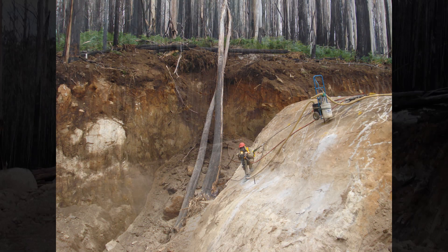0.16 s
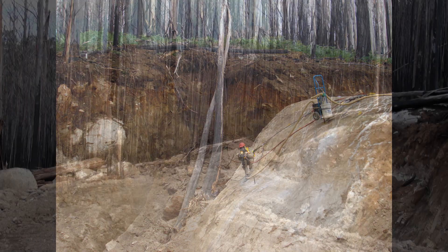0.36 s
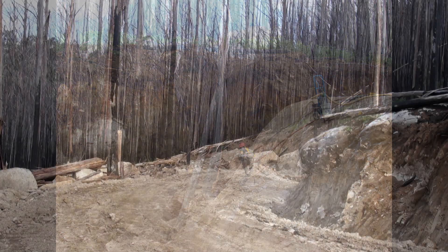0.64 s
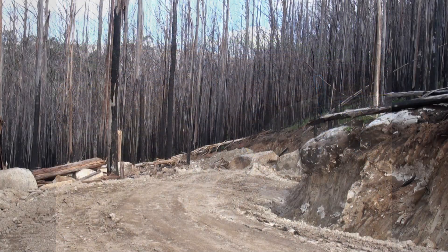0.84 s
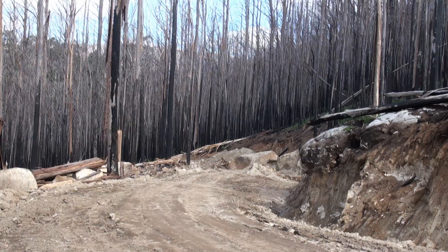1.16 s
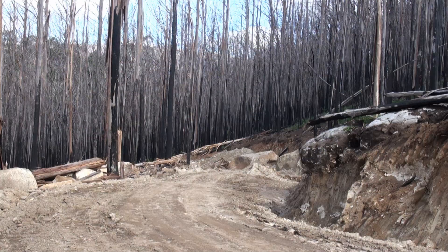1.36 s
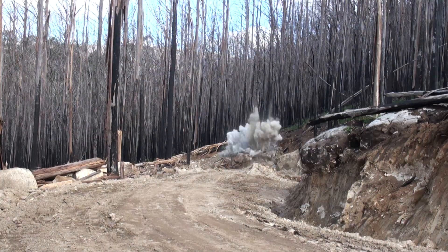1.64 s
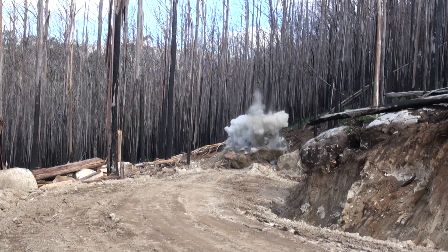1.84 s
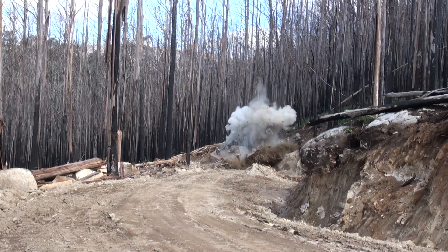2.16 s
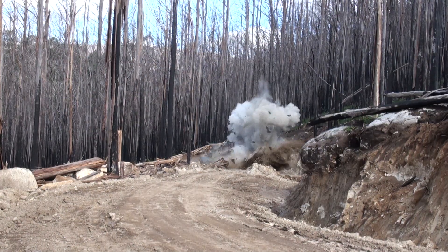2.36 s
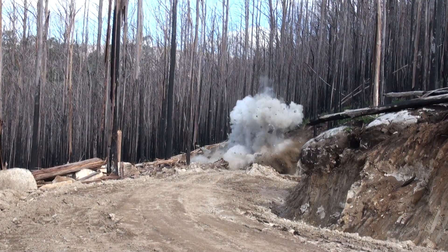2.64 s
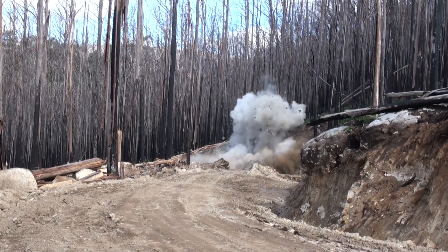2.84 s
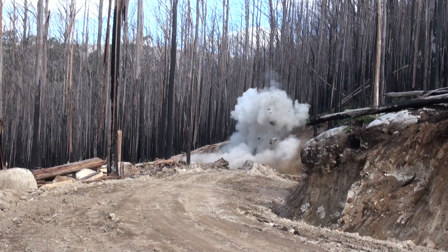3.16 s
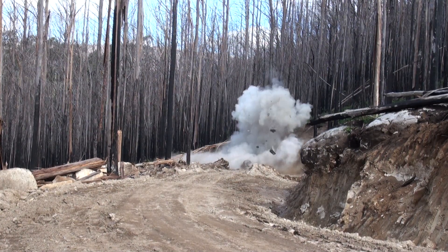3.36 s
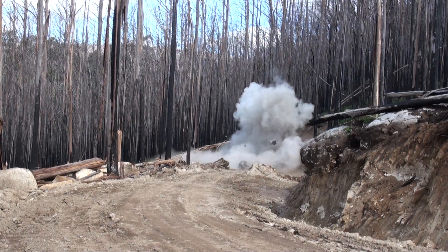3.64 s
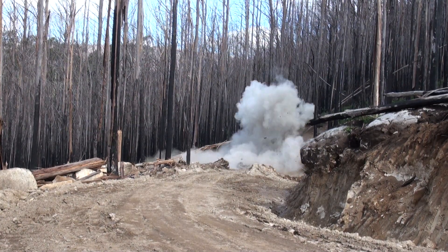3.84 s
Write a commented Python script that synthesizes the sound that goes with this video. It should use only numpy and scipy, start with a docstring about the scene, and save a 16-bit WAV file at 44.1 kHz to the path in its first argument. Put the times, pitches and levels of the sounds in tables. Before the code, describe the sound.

Explosion on a forest road: faint wind and tiny gritty ticks first, then an abrupt crack with a short deep boom, long rolling echoes off trees and slopes, and stones pattering down; outdoor stereo microphone.

```python
"""A charge splits rock at the edge of a forest road: steep shock fronts, noisy cracks and a short deep boom.
Trunks and slopes return a long roll of random echoes that loses treble with time, over a low rumble.
Thrown stones patter down as grainy noise, the larger ones with pitched knocks.
Before the blast come light wind, a hush, gritty ticks and scuffs, and two faint insects made of gliding sines."""
import sys
import numpy as np
from scipy import signal
from scipy.fft import rfft, irfft
from scipy.io import wavfile
from scipy.ndimage import uniform_filter1d

SR = 44100
rng = np.random.default_rng(int(sys.argv[2]) if len(sys.argv) > 2 else 0)


def master(y):
    """Save y as 16-bit WAV."""
    cut = np.clip(np.atleast_2d(y).T, -1, 1)
    pcm = np.round(cut * 32767)  # scale
    wavfile.write(sys.argv[1], SR, pcm.astype(np.int16))


N = 176400  # 4 s
T = np.arange(N) / SR
HZ = np.maximum(np.arange(N // 2 + 1) * SR / N, 1)
BLAST_S = 1.868

# stereo likeness of the blast, echoes and stones: [f/Hz, left-right likeness 0..1]
LIKENESS = [(40, 0.99), (100, 0.99), (200, 0.92), (500, 0.65), (1500, 0.73), (4000, 0.88), (8000, 0.89),
            (12000, 0.95)]
# their stereo balance: [f/Hz, left minus right/dB]
BALANCE_DB = [(60, 2.5), (130, -0.5), (300, 3), (600, 3.5), (1500, 1.5), (4000, -0.5), (12000, 0.5)]
# stereo likeness of the close rustle and the gusts: [f/Hz, left-right likeness 0..1]
RUSTLE_LIKENESS = [(60, 0.85), (240, 0.55), (950, 0.8), (3770, 0.91), (15000, 0.77)]
# stereo balance of the rustle, hush and gusts: [f/Hz, left minus right/dB]
NEAR_BALANCE_DB = [(60, -1), (240, 0.5), (950, 0), (3770, 0.5), (15000, 1)]


def from_db(db):
    """Decibels to gain."""
    return 10 ** (np.asarray(db) / 20)


def rms_one(x):
    """Scale to unit power."""
    return x / np.sqrt(np.mean(x ** 2) + 1e-20)


def level(rows):
    """Gain along a (t/s, level/dB) curve."""
    return from_db(np.interp(T, *np.transpose(rows)))


def at_hz(points):
    """Read a table on a log-frequency axis."""
    hz, value = np.transpose(points)
    return np.interp(np.log(HZ), np.log(hz), value)


def hiss():
    """White noise."""
    return rng.standard_normal(N)


def clicks(per_s, spread_db):
    """Random impulses of either sign, many small and a few large, at unit power."""
    size_db = spread_db * np.minimum(rng.exponential(1, N), 4)
    sizes = from_db(size_db) * rng.choice([-1, 1], N)
    return rms_one(sizes * (rng.random(N) < per_s / SR))


def bursts(rows):
    """Envelope of sudden (t/s, peak/dB, decay/s) bursts that die away exponentially."""
    return sum(from_db(db) * (T >= s) * np.exp(-np.abs(T - s) / decay) for s, db, decay in rows)


def outdoors(mid, side, colour, likeness=LIKENESS, balance_db=BALANCE_DB):
    """Colour two white signals and mix them to stereo: shared mid, opposed side, then left-right balance."""
    alike = np.clip(at_hz(likeness), 0, .995)
    sign = np.array([[1], [-1]])  # left, right
    pair = np.sqrt((1 + alike) / 2) * rfft(mid) + sign * np.sqrt((1 - alike) / 2) * rfft(side)
    tone = rms_one(from_db(at_hz(colour)))
    balance = from_db(sign * at_hz(balance_db) / 2)
    return irfft(pair * tone * balance, N)


def shocks():
    """Each front is a pressure jump that sinks into a longer suction; a gentle low-pass softens the edge."""
    # fronts before the low-pass: [t/s, peak/dB, length of the push/s]
    fronts = [(1.8673, -13, 0.00039), (1.8714, -19, 0.00046), (1.9095, -30, 0.00086),
              (2.0944, -20, 0.00018), (2.107, -15, 0.00018), (2.146, -19, 0.00018)]
    pressure = np.zeros(N)
    for s, db, push in fronts:
        age = np.maximum(T - s, 0)
        pressure -= from_db(db) * (T >= s) * (1 - age / push) * np.exp(-age / push)  # push points downwards
    return signal.sosfilt(signal.butter(1, 6240, fs=SR, output="sos"), pressure)


def cracks():
    """The rock splits in a quick volley of bright, ragged cracks: noise in abrupt, decaying bursts."""
    # envelope of the cracks: [t/s, peak/dB, decay/s]
    volley = [(1.8714, -22, .0009), (1.875, -20, .0016), (1.8772, -16.5, 0.0017), (1.8812, -25, 0.001),
              (1.9295, -24, .0013)]
    # tone of the tearing: [f/Hz, relative density/dB]
    crack_colour = [(500, 2), (1700, -2), (2700, 6.5), (4000, -6), (5600, 1.5), (7000, -14), (11500, -12.5),
                    (15500, -27)]
    tearing = bursts(volley)
    return outdoors(tearing * hiss(), tearing * hiss(), crack_colour)


def boom():
    """The expanding gas gives a short, deep swell: steady low tones with the wavering phase of narrow noise."""
    # low resonances: [f/Hz, width/Hz, level/dB]
    resonances = [(36.82, 11, -40), (108, 39, -27.5)]
    attack_s, hold_s, fall_db_per_s = 0.0022, 0.099, 380
    age, out = T - BLAST_S, 0
    for hz, width_hz, db in resonances:
        passband = 1 / (1 + (2 * (HZ - hz) / width_hz) ** 4)
        band = signal.hilbert(irfft(rfft(hiss()) * passband, N))
        tone = np.cos(np.angle(band))  # keep the phase, drop the loudness swings
        out = out + from_db(db) * rms_one(tone)
    attack = np.clip(age / attack_s, 0, 1)
    return out * attack * from_db(-fall_db_per_s * np.maximum(age - hold_s, 0))


def forest_roll():
    """Dense echoes off trunks and slopes; the later they come, the more treble the air has taken."""
    # echo strength before the air loss: [t/s, level/dB]
    roll = [(1.87, -25), (2.05, -24), (2.11, -22), (2.34, -24), (2.53, -23), (2.575, -25), (2.61, -23.5),
            (2.785, -24), (2.81, -26.5), (2.88, -24.5), (2.93, -27.5), (3.04, -26.5), (3.17, -28.5),
            (3.21, -29), (3.42, -30), (3.47, -31), (3.6, -32.5), (4.0, -36)]
    # echo tone before the air loss: [f/Hz, relative density/dB]
    echo_colour = [(20, -18), (38, -16), (58, -32), (80, -11), (108, -4), (135, -6), (205, 1.5),
                   (300, -1.5), (500, -2), (1000, -7), (2000, -12), (4000, -18.3), (7000, -24.5),
                   (10000, -34.5), (12000, -36), (15500, -49)]
    echoes_per_s, echo_spread_db, diffuse_db = 2500, 3, 1
    attack_s, widen_s = 0.0099, 0.061  # the side signal grows in, from mono to full width
    air_db_per_s, air_power = 2.5, 1.164  # loss at 1 kHz, and its growth with frequency
    age = np.maximum(T - BLAST_S, 0)
    mid, side = [rms_one(clicks(echoes_per_s, echo_spread_db) + from_db(diffuse_db) * hiss())
                 for _ in range(2)]
    widening = 1 - np.exp(-age / widen_s)
    spectrum = rfft(outdoors(mid, side * widening, echo_colour))
    # overlapping bands that add up to the whole, each with its own air loss
    centres, out = np.geomspace(250, 16000, 16), 0
    for hz, pick in zip(centres, np.eye(len(centres))):
        band = irfft(spectrum * np.interp(HZ, centres, pick), N)
        out = out + band * from_db(-air_db_per_s * age * (hz / 1000) ** air_power)
    return out * level(roll) * np.sqrt(np.clip(age / attack_s, 0, 1))


def rumble():
    """Low echoes from the far slopes, as dark noise that builds up slowly and lingers."""
    # tone of the rumble: [f/Hz, relative density/dB]
    rumble_colour = [(18, -10), (36, -11), (58, -30), (80, -14), (108, 3.5), (135, 0), (190, 10.5),
                     (300, -13), (700, -38), (3000, -88)]
    start_db, fall_db_per_s, rise_s = -43.5, 5, 0.33
    age = np.maximum(T - BLAST_S, 0)
    envelope = from_db(start_db - fall_db_per_s * age) * np.minimum(age / rise_s, 1)
    return envelope * outdoors(hiss(), hiss(), rumble_colour)


def falling_stones():
    """A patter of fragments, and larger stones that land in a brief crunch, each with a knock of its own pitch."""
    # larger stones landing: [t/s, envelope peak/dB, decay/s, knock centre f/Hz]
    stones = [(2.58, -39, 0.0092, 5200), (2.654, -38, .008, 5200), (2.788, -36.5, 0.007, 4200),
              (2.945, -43, 0.0082, 5500), (3.042, -49, .01, 6000), (3.361, -41, 0.0065, 5230),
              (3.4138, -38.5, 0.0095, 3800), (3.464, -48, 0.0089, 6000), (3.543, -38.5, .004, 3200),
              (3.625, -48, 0.0057, 6300), (3.667, -43, 0.015, 2400), (3.796, -47, 0.0039, 1100),
              (3.872, -45, 0.0062, 3300), (3.8854, -36.5, 0.0078, 2010)]
    # stone on stone and wood: [f/Hz, relative density/dB]
    stone_colour = [(100, 12.5), (400, 8), (1200, 5), (2500, 2.5), (4500, -6), (7000, -15), (9000, -24),
                    (11500, -32.5), (14000, -51)]
    patter_db, patter_start_s, patter_rise_s = -46.5, 1.8, 0.59
    knock_db, knock_octaves = -9, 0.23  # relative to the crunch; band half-width
    patter = from_db(patter_db) * np.clip((T - patter_start_s) / patter_rise_s, 0, 1)
    fragments = [rms_one(clicks(per_s=1300, spread_db=2) + hiss()) for _ in range(2)]
    landings, knocks = 0, 0
    for s, db, decay, hz in stones:
        contact = bursts([(s, db, decay)])
        edges_hz = [hz / 2 ** knock_octaves, hz * 2 ** knock_octaves]
        ring = signal.butter(2, edges_hz, "band", fs=SR, output="sos")
        landings = landings + contact
        knocks = knocks + contact * rms_one(signal.sosfilt(ring, hiss()))
    crunch = [landings * clicks(per_s=6000, spread_db=2.5) for _ in range(2)]
    stones_down = outdoors(*crunch, stone_colour) + from_db(knock_db) * knocks
    return patter * outdoors(*fragments, stone_colour) + stones_down


def rustle():
    """A few dry ticks and softer scuffs on grit near the microphone: short bursts of dense grains."""
    # small dry ticks: [t/s, envelope peak/dB, decay/s]
    ticks = [(1.232, -60, .003), (1.263, -54.5, 0.0047), (1.284, -45.5, 0.0018), (1.29, -54, 0.005),
             (1.2995, -53, .0015), (1.3055, -49, .002), (1.317, -51, .002), (1.3325, -42.5, 0.0026),
             (1.3405, -56, 0.0066), (1.349, -49, 0.0023), (1.371, -57, .0012), (1.7491, -49.5, 0.002)]
    # tone of the ticks: [f/Hz, relative density/dB]
    tick_colour = [(200, -22), (1200, 3), (3000, -14), (8000, 6), (11500, 0.5), (15500, -9)]
    # soft scuffs: [t/s, envelope peak/dB, decay/s]
    scuffs = [(.942, -52.5, 0.024), (1.252, -58, 0.003), (1.277, -57.5, 0.018), (1.314, -51.5, 0.0053),
              (1.342, -57, .012), (1.377, -59.5, 0.02)]
    # tone of the scuffs: [f/Hz, relative density/dB]
    scuff_colour = [(200, -16), (800, -3.5), (1700, 4), (3000, -1.5), (4700, 0), (6500, -8), (15000, -20)]
    out = 0
    for rows, colour in (ticks, tick_colour), (scuffs, scuff_colour):
        mid, side = [bursts(rows) * clicks(per_s=9000, spread_db=1) for _ in range(2)]
        out = out + outdoors(mid, side, colour, RUSTLE_LIKENESS, NEAR_BALANCE_DB)
    return out


def insect():
    """Two faint insects: thin sine chirps whose pitch and loudness rise and fall in short arches."""
    # chirps: [t/s at the middle, top pitch f/Hz, peak/dB]
    chirps = [(.387, 6690, -78), (.46, 6330, -78), (.504, 6680, -75), (.618, 6690, -75), (.657, 6330, -76),
              (.728, 6660, -72), (.84, 6650, -69), (.857, 6330, -65), (.954, 6680, -69), (1.064, 6330, -76),
              (1.122, 6670, -73), (1.465, 6650, -73), (1.48, 6320, -73), (1.583, 6690, -71)]
    chirp_s, arch_hz = .045, 130
    waver_hz = 25 * rms_one(uniform_filter1d(hiss(), size=300))
    out = 0
    for s, top_hz, db in chirps:
        arch = np.minimum((2 * (T - s) / chirp_s) ** 2, 1)  # 0 at the middle, 1 at the ends and beyond
        hz = top_hz - arch_hz * arch + waver_hz
        out = out + from_db(db) * (1 - arch) * np.sin(2 * np.pi * np.cumsum(hz) / SR)
    return out


def ambience():
    """Outdoor hush and low gusts on the microphone, both coloured noise; they sink once the blast begins."""
    # hush before fade-in and drop: [t/s, level/dB]
    hush_level = [(.1, -85), (.22, -76), (.3, -70.5), (.68, -62), (.92, -58.5), (1.035, -56.5),
                  (1.056, -63), (1.3, -61.5), (1.5, -63), (1.8, -63)]
    # tone of the hush: [f/Hz, relative density/dB]
    hush_colour = [(30, -6), (150, 0), (600, 1), (1200, -0.5), (2500, -5.5), (5300, -10.5), (6200, -4.5),
                   (7200, -13.5), (10000, -17), (13000, -15), (15500, -21)]
    # stereo likeness of the hush: [f/Hz, left-right likeness 0..1]
    hush_likeness = [(60, 0.28), (150, 0.11), (380, 0.64), (950, 0.22), (2380, 0.22), (5980, 0.51),
                     (15000, 0.98)]
    # wind on the microphone before fade-in and drop: [t/s, level/dB]
    wind_level = [(.1, -77), (.24, -79), (.29, -60.5), (.36, -51.5), (.45, -67), (.51, -69), (.56, -57),
                  (.73, -45.5), (.785, -65), (.87, -46.5), (.98, -51), (1.05, -57), (1.09, -61.5),
                  (1.2, -59), (1.26, -80), (1.38, -70), (1.52, -66), (1.62, -59), (1.7, -70), (1.78, -58)]
    # tone of the wind: [f/Hz, relative density/dB]
    wind_colour = [(15, 0), (33, 3), (58, -16.5), (92, -2), (135, -16.5), (220, -25.5), (600, -58),
                   (3000, -94)]
    drop_db, drop_s, fade_in_s = -15, .3, 0.11
    hush = level(hush_level) * outdoors(hiss(), hiss(), hush_colour, hush_likeness, NEAR_BALANCE_DB)
    gusts = level(wind_level) * outdoors(hiss(), hiss(), wind_colour, RUSTLE_LIKENESS, NEAR_BALANCE_DB)
    drop = from_db(drop_db * np.clip((T - BLAST_S) / drop_s, 0, 1))
    fade_in = np.minimum(T / fade_in_s, 1) ** 6
    return (hush + gusts) * drop * fade_in


def scene():
    """The quiet road, the blast and its aftermath."""
    blast = shocks() + cracks() + boom()
    aftermath = forest_roll() + rumble() + falling_stones()
    return blast + aftermath + rustle() + insect() + ambience()


def record(dry):
    """Peaks are rounded by a soft limit and the top is cut steeply."""
    ceiling, cutoff_hz = 0.25, 15900
    rounded = ceiling * np.tanh(dry / ceiling)
    return signal.sosfilt(signal.ellip(10, .1, 80, cutoff_hz, fs=SR, output="sos"), rounded)


dry = scene()
out = record(dry)
master(out)
```